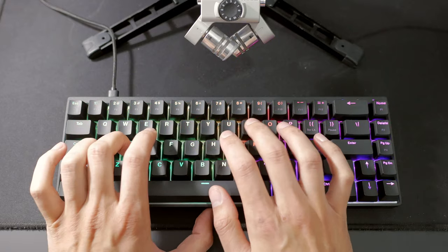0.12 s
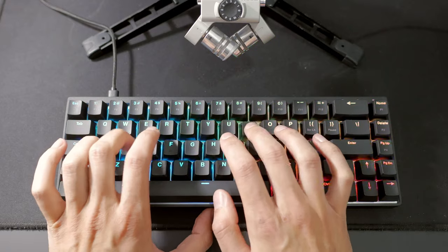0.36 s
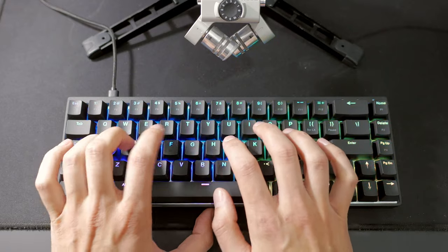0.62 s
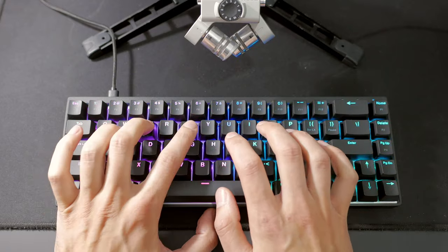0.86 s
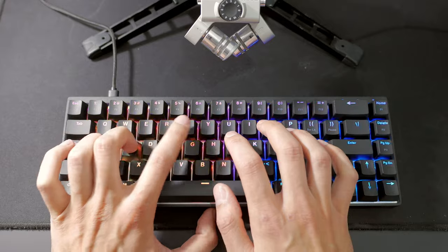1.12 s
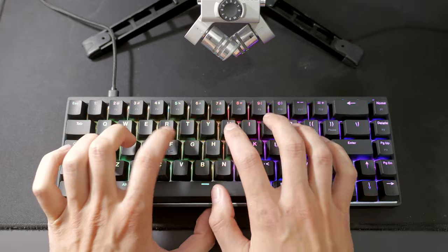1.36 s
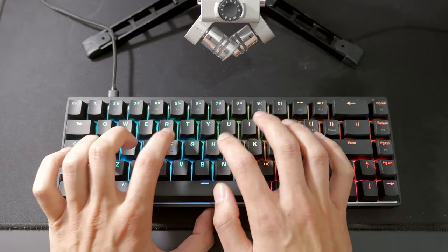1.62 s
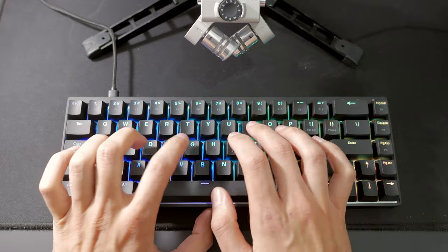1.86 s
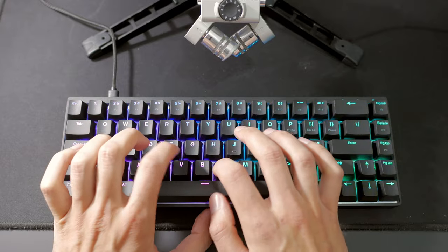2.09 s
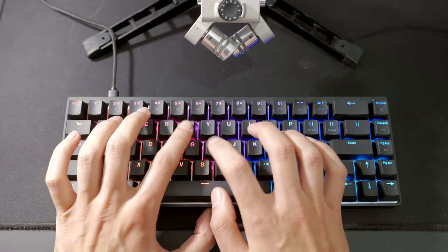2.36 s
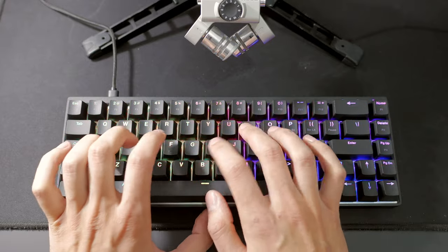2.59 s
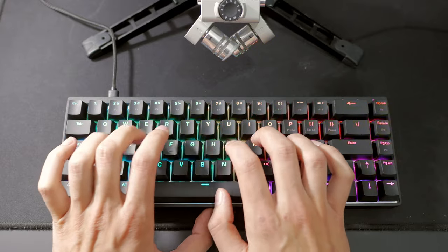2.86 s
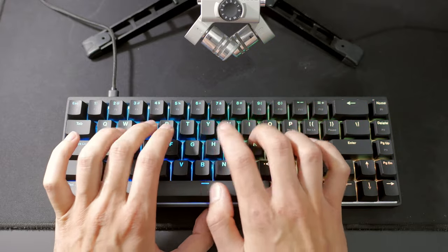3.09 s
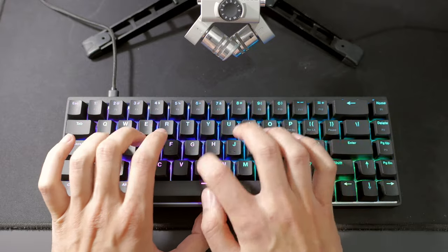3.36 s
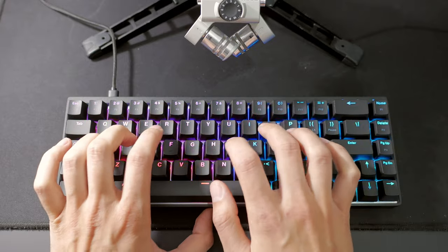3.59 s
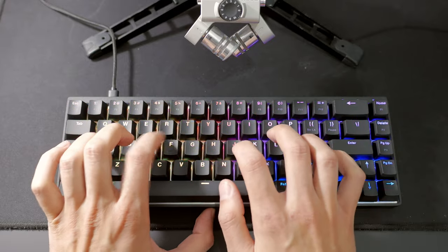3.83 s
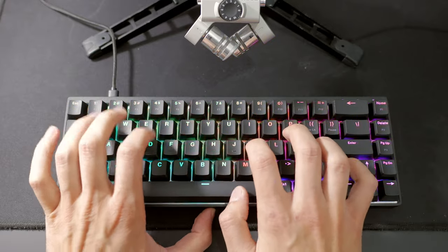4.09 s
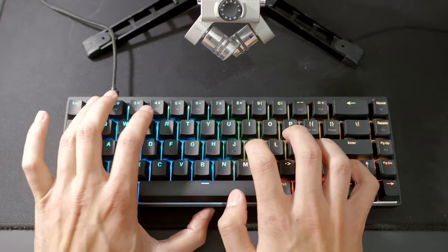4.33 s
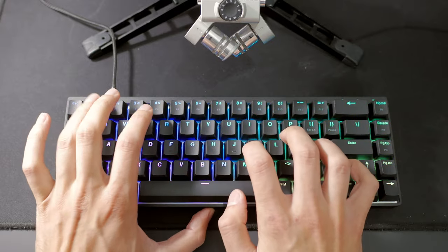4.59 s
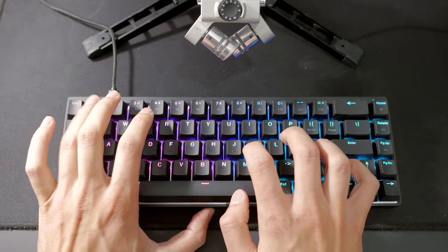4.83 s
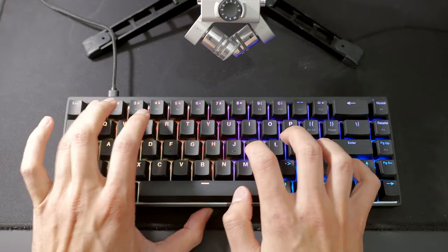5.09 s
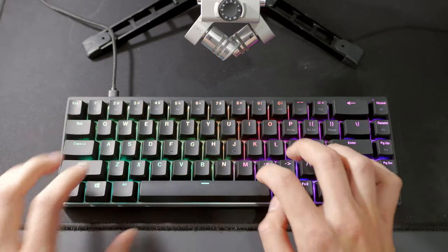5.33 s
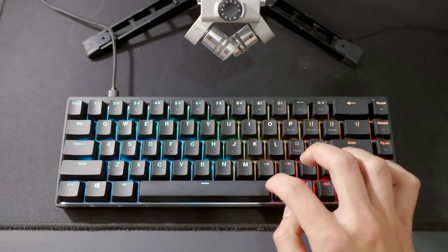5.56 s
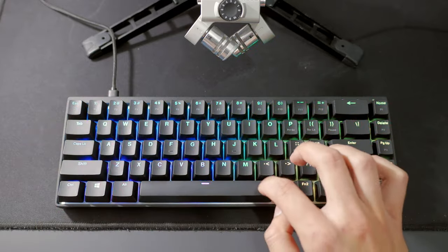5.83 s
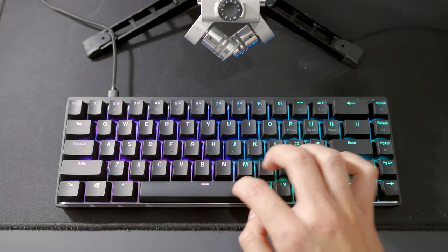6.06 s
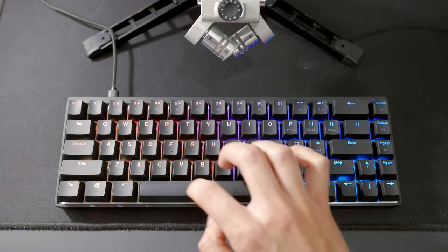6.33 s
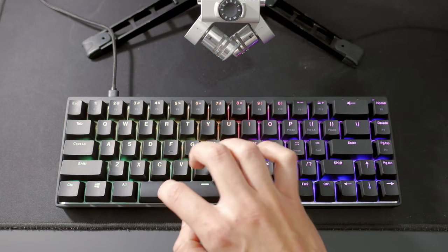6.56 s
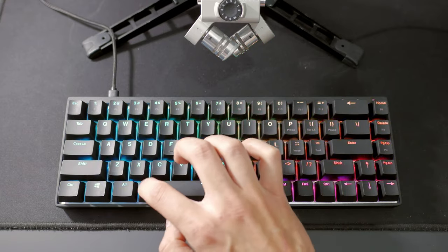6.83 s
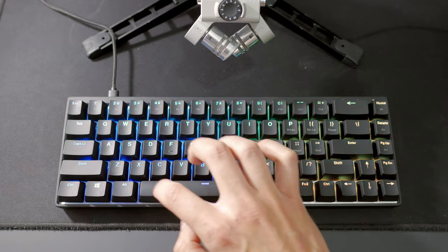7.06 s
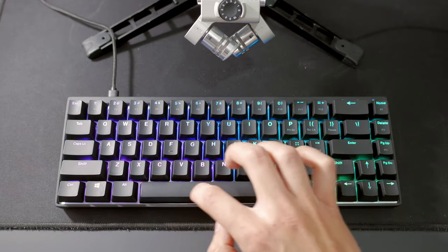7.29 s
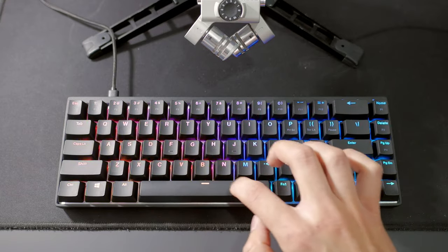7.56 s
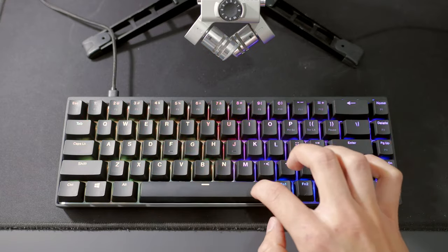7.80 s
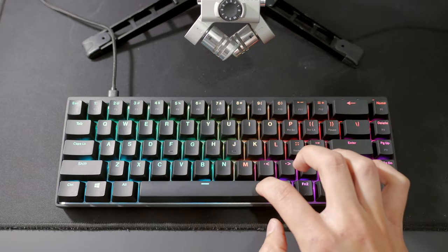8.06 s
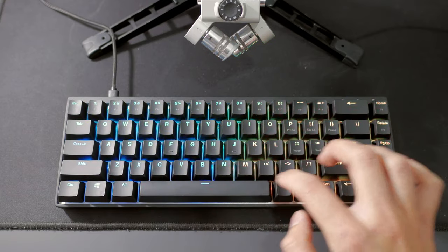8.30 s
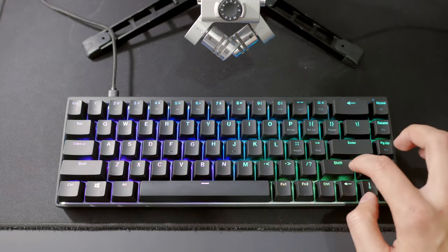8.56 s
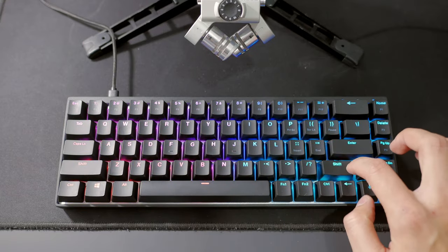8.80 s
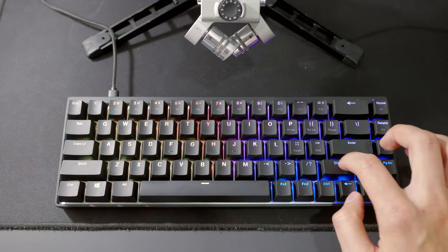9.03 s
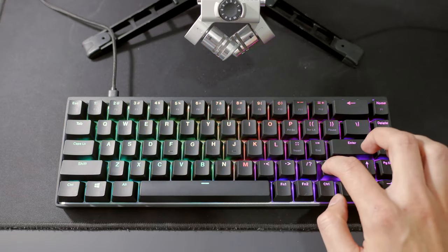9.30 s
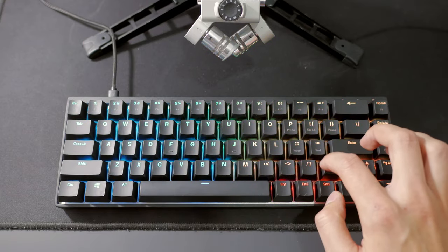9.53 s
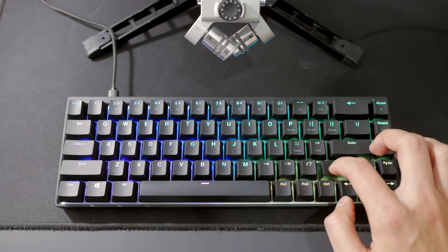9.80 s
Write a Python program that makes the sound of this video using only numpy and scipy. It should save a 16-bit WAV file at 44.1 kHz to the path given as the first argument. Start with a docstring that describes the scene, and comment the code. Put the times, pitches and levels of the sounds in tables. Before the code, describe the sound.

Fast, dry clacking on a mechanical keyboard at close range, then two gaps and steady single-key drumming, deeper spacebar thocks and enter-key clunks, small quiet room.

```python
"""Fast typing, letters under both hands, on a mechanical keyboard on a desk mat, heard by a crossed stereo pair
close behind it in a small room; then one finger drums shift, enter, space and enter again.
Each stem hits bottom or top: a rattling contact rings case, cap and stem for a few ms, and the desk thumps.
Soft rubs and scrapes lead into each blow; once a spring pings and the hollow case knocks.
A diffuse noise tail makes the room; wavering mains hum, rumble and hiss lie below."""
import sys
import numpy as np
from scipy import signal
from scipy.fft import rfft, irfft, next_fast_len
from scipy.io import wavfile
from scipy.ndimage import uniform_filter1d

SR = 44100
rng = np.random.default_rng(int(sys.argv[2]) if len(sys.argv) > 2 else 0)


def transcribe(u):
    """Save the signal u as a 16-bit wav file named by the first command-line argument.

    u: samples, shape (n,) or (channels, n), limited to [-1, 1]; the rate is SR.
    q: integer samples, one column per channel.
    """
    v = np.clip(np.atleast_2d(u).T, -1, 1)
    q = np.round(v * 32767).astype(np.int16)
    wavfile.write(sys.argv[1], SR, q)


def ratio_of_db(decibels):
    """Turn decibels (scalar or array-like) into linear amplitude factors; 0 dB maps to 1."""
    return 10 ** (np.asarray(decibels, float) / 20)


N = 437031

# stem hits its stop: (time [s], force [dB], hardness as tick over knock [dB], push of the hand into the desk [dB])
BLOWS = [(0.1099, -16.5, 14.5, -42), (0.1338, -16.5, 2, -42), (0.2074, -13.5, 3.5, -37),
         (0.2796, -16, -1, -26.5), (0.387, -11.5, 0.5, -24.5), (0.4781, -14.5, 6, -32),
         (0.566, -16.5, 5, -58.5), (0.6364, -17.5, 2, -33.5), (0.7188, -13, -5, -26.5),
         (0.749, -18.5, -6, -32.5), (0.8188, -15, 6, -31), (0.924, -13, 27, -39), (0.998, -13, 26.5, -43),
         (1.0324, -14.5, 4.5, -36), (1.14, -17, 0, -30.5), (1.2797, -17.5, 3.5, -39.5),
         (1.375, -17, 8.5, -37.5), (1.388, -14.5, -13, -25), (1.4967, -17.5, 3.5, -28.5),
         (1.694, -12.5, 9, -40), (1.8805, -24, 47, -31.5), (1.894, -15, 3, -38), (1.98, -15.5, 20, -42),
         (2.0505, -16.5, 2.5, -38.5), (2.112, -18.5, -1, -43.5), (2.1495, -16, 30, -57.5),
         (2.1601, -17, 0.5, -31.5), (2.24, -15, 2, -42), (2.3391, -13, -8, -26.5),
         (2.4522, -18, 6.5, -31.5), (2.5457, -13.5, 14.5, -40.5), (2.6472, -11, 2, -34),
         (2.7381, -12.0, 24.5, -36.5), (2.8928, -16, -5.5, -28), (3.0668, -13.5, 11.5, -33),
         (3.168, -11.5, 7, -35), (3.2653, -17, 8.5, -42.5), (3.367, -10.5, 32.5, -33),
         (3.4605, -22.5, 22.5, -35.5), (3.4794, -17, 3, -38), (3.542, -17.5, 2, -45),
         (3.6216, -14.5, 32.5, -35.5), (3.7345, -17, -2, -32.5), (3.816, -17, 10.5, -39.5),
         (3.8601, -19, 3, -49), (3.9059, -16.5, 0.5, -42), (4.0031, -17, 7, -33.5),
         (4.0925, -14, -8.5, -26), (4.114, -21, 0, -32.5), (4.3916, -8.5, -3.5, -33.5),
         (4.4672, -11, -3, -37), (4.576, -8, -1.5, -29), (4.654, -11.5, -2, -36), (4.746, -11, -3, -33),
         (4.842, -17, -4.5, -39), (4.944, -13, -10, -42.5), (5.0055, -16.5, -3.5, -41.5),
         (5.0963, -9.5, -2.5, -32), (5.194, -16, -5, -37), (5.2463, -15.5, 3, -41),
         (5.8624, -15.5, -5.5, -30), (5.9319, -9.5, 1.5, -29), (6.0121, -11, -2.5, -26),
         (6.0938, -12.5, 1, -31.5), (6.168, -10, -3, -26.5), (6.2605, -16.5, -11, -30),
         (6.3374, -12.5, -1.5, -26), (6.4942, -15, -4, -25), (6.5728, -15.5, -5, -32.5),
         (6.6462, -16.5, 9.5, -42.5), (6.6686, -15.5, -10.5, -24), (6.8188, -18.5, -3.5, -33),
         (7.012, -17, -3, -25.5), (7.157, -18, 15.5, -34.5), (7.186, -16.5, -6, -27.5),
         (7.2515, -14, -2.5, -28), (7.3541, -13.5, -3, -25), (7.4274, -17, -6, -28.5),
         (7.5309, -11.5, -5.5, -26.5), (7.606, -15, -2, -29), (7.6929, -11, -7, -24.5),
         (7.8715, -11.5, -3, -24.5), (8.0432, -11, -11.5, -26.5), (8.1377, -17, -0.5, -31),
         (8.222, -10.5, -7.5, -24), (8.2992, -8, 6, -25.5), (8.937, -12, -2, -34),
         (9.0237, -14.5, -2.5, -29), (9.0998, -13, -7.5, -35), (9.183, -12.5, -3.5, -26),
         (9.3585, -13.5, 0, -29), (9.5291, -13, -7, -30), (9.7031, -12.5, -3, -29),
         (9.78, -15.5, -1.5, -37.5), (9.87, -11, 0, -25)]
# lighter contacts, a fingertip lands, a stem rattles or a released key comes back up: (time [s], level [dB])
TOUCHES = [(-0.005, -22), (0.272, -24), (0.376, -35.5), (0.417, -26), (0.626, -27.5), (1.256, -29),
           (1.48, -29.5), (1.604, -19.5), (2.011, -36), (2.429, -23.5), (2.523, -29.5), (2.76, -30),
           (2.868, -22.5), (2.913, -29.5), (3.089, -28), (3.131, -29.5), (4.204, -24), (4.232, -23),
           (4.361, -32.5), (5.829, -36), (6.416, -25), (6.467, -28), (6.735, -18.5), (6.848, -29.5),
           (6.912, -19), (6.98, -26), (7.078, -23.5), (7.775, -19), (7.965, -24.5), (8.19, -31),
           (8.798, -42.5), (8.839, -35), (8.865, -37.5), (9.257, -19), (9.426, -19), (9.6, -21.5)]
# keys in play: (from [s], key [1 letters 2 shift 3 space 4 enter], left minus right before the parts' offset [dB],
# change of colour [dB], rattle before stretching [ms], spread of tuning [share])
KEYS = [(0, 1, 0, 9.5, 4.47, 0.068), (4.3, 2, -2.5, -4.2, 2.68, 0.013), (5.22, 4, 2, 4, 7.9, 0.0049),
        (5.5, 3, -0.3, 3, 3.53, 0.011), (8.5, 4, 4, 3.5, 3.9, 0.025)]
# by key (letters, shift, space, enter): (share of the force in the cap [dB], in case and stem together [dB],
# hardness of a light touch [dB], gain of the desk's upper modes [dB], lowest pitch radiated [Hz])
KEY_SHARES = [(-3, -1.5, -3, 2, 260), (-4, -1.5, 6, -2.5, 510), (-3, -5, -9, 2.5, 330),
              (-7, -3, -7, -6, 453)]
# soft rub before a blow, relative: by key (letters, shift, space, enter) [dB]
RUB_DB = (1, -18.5, 3, 4.5)
# modes of case (knock), cap (clack) and stem (tick), one row a mode: (letters, shift, space, enter [dB])
KNOCK_MODES_DB = [(-11, -17.5, 0, 2), (-7, -24.5, -5, 7.5), (5.5, 11, -46.5, -3.5), (7.5, 5.5, 11, 17),
                  (10.5, 10.5, 7.5, 5), (8, 11.5, 7.5, 0.5)]
CLACK_MODES_DB = [(-2, -3.5, -2, -4), (1.5, 1, -4.5, -11.5), (7, 0.5, 1, 0.5), (4, -5.5, 8.5, 2),
                  (7, -5, 7, -0.5), (0, -1.5, 1, -1.5)]
TICK_MODES_DB = [(-5, 0, 1, 3), (-5.5, -18, -0.5, 5), (5.5, -6, 6, 3), (5, 9, 3, 3.5),
                 (-13.5, -18, 4, -1.5), (-14.5, -9, -12, -16.5)]
# pitches of those modes before the change of tuning: one a mode [Hz]
KNOCK_HZ = (515, 704, 1100, 1250, 1420, 1760)
CLACK_HZ = (2180, 2435, 2760, 3035, 3600, 4280)
TICK_HZ = (5000, 6300, 7850, 8650, 11600, 14500)
# spring ping, then case modes: (level [dB], pitch [Hz], t60 [s])
SPRING = [(-24, 6380, 0.046), (-17.5, 690, 0.024), (-38, 1100, 0.26)]
# desk and stand modes: (pitch [Hz], level over push [dB], t60 [s], left minus right [dB], left leads [rad])
DESK = [(59.7, -3.5, 0.67, -1.5, 1.5), (87.8, -1, 0.079, 1, 0.4), (123.4, -3, 0.23, -6.1, 0.58),
        (176.3, -2.5, 0.069, 3.5, 0.39), (249.4, -1, 0.082, 4.5, 1.73), (338, -6.5, 0.055, -5.5, 0.45),
        (454, -11.5, 0.071, -4, 0.46)]
# room decay: (band [Hz], t60 [s])
ROOM_T60 = [(100, 1), (12000, 0.33)]
# mains hum before the waver: (pitch [Hz], level [dB rms])
HUM = [(119.8, -55.5), (239.6, -68), (359.4, -75)]
# rumble and hiss, relative spectrum: (pitch [Hz], density [dB])
AIR = [(25, -51), (36, -75), (50, -73), (140, -88), (1000, -108), (2200, -115), (15000, -121)]


def blows():
    """Stems hit their stops: a firm push gives one sharp click, a light one a blunt rattle."""
    s, force_db, hardness_db, push_db = np.transpose(BLOWS)
    firm_push_db, click_db_per_push_db = -30, 0.59
    sharp = ratio_of_db(click_db_per_push_db * np.minimum(push_db - firm_push_db, 0))
    stem_click, heavy_click = 5.5 * sharp, 28 * sharp[:, None]   # height over the chatter
    contact = rattle(s, stem_click, stretch=0.75, rise_ms=0.29)
    return strike(s, contact, *share_out(s, force_db, hardness_db), heavy_click)


def touches(s, level_db, stretch, rise_ms, brighter_db=0):
    """Soft, drawn-out contacts: chatter without a first click."""
    hardness_db = shares_at(s)[2] + brighter_db
    return strike(s, rattle(s, 0, stretch, rise_ms), *share_out(s, level_db, hardness_db))


def slides():
    """Before every blow comes a soft rub, then a short scrape of the stem in its guide; after it the cap shakes."""
    s, force_db = np.array(BLOWS)[:, 0], np.array(BLOWS)[:, 1]
    chance = rng.standard_normal((len(s), 4))
    uneven_db = 2.5 * chance[:, 1:3]
    rub_db = force_db + np.array(RUB_DB)[key_index(s)] - 25.5 + uneven_db[:, 0]
    scrape_db = force_db - 22.5 + uneven_db[:, 1]
    rub = touches(s - 0.027 + 0.0035 * chance[:, 0], rub_db, 2.0, 19.0, brighter_db=3.0)
    scrape = touches(s - 0.009 + 0.0014 * chance[:, 3], scrape_db, 1.6, 2.5, brighter_db=4.8)
    shake = touches(s, force_db - 13, 1.79, 11.0)
    return rub + scrape + shake


def key_at(times):
    """The row of KEYS in play at each time."""
    keys = np.array(KEYS)
    return keys[np.searchsorted(keys[1:, 0], times)]


def key_index(times):
    """Which key is in play, from 0: letters, shift, space, enter."""
    return np.round(key_at(times)[:, 1]).astype(int) - 1


def shares_at(times):
    """The columns of KEY_SHARES for the key in play at each time."""
    return np.array(KEY_SHARES)[key_index(times)].T


def share_out(s, force_db, hardness_db):
    """Knock, clack and tick levels: a hard contact favours the stem's tick, a soft one the case's knock."""
    cap_db, rest_db = shares_at(s)[:2]
    knock_db = force_db + rest_db - 10 * np.log10(1 + ratio_of_db(hardness_db) ** 2)
    return knock_db, force_db + cap_db, knock_db + hardness_db


def rattle(times, first, stretch, rise_ms):
    """One contact per row: a first click, then uneven chatter that dies away."""
    ms = np.arange(1024) * 1000 / SR
    draw = rng.standard_normal((len(times), 2, 1024))
    length_ms = stretch * key_at(times)[:, 4:5] * np.exp(0.33 * draw[:, 0, :1])
    envelope = np.exp(-(ms / length_ms) ** 2) * (1 - np.exp(-ms / rise_ms))
    chatter = draw[:, 0] * np.exp(0.54 * draw[:, 1]) * envelope
    chatter[:, 0] = first
    return chatter


def strike(s, contact, knock_db, clack_db, tick_db, first=0):
    """Case, cap and stem ring from one contact; case and cap get an added click just after the start."""
    heavy = contact + first * (np.arange(1024) == 18)
    knock = ring(s, heavy, KNOCK_HZ, KNOCK_MODES_DB, 20, knock_db, pan_db=-4, apart_rad=0.6)
    clack = ring(s, heavy, CLACK_HZ, CLACK_MODES_DB, 24, clack_db, pan_db=0.2, apart_rad=0.55)
    tick = ring(s, contact, TICK_HZ, TICK_MODES_DB, 15, tick_db, pan_db=0.3, apart_rad=0.95)
    sound = knock + clack + tick
    edge_hz = shares_at(s)[4]
    for hz in np.unique(edge_hz):   # each key sounds thin below its own lowest pitch
        highpass = signal.butter(4, hz, "high", fs=SR, output="sos")
        sound[edge_hz == hz] = signal.sosfilt(highpass, sound[edge_hz == hz])
    return place(s, sound)


def ring(times, contact, hz, modes_db, cycles, level_db, pan_db, apart_rad):
    """The contact strikes modes of chance strength and tuning, with chance phase between capsules.

    Each mode dies by 60 dB in the given cycles; a weak part rings on."""
    linger_db, times_longer = -24, 5.0
    t, modes_db, key = np.arange(3072) / SR, np.array(modes_db), key_at(times)
    draw = rng.standard_normal((len(times), 2, len(modes_db)))
    own_db = modes_db.T[key_index(times)]
    strength = ratio_of_db(own_db + key[:, 3:4] * draw[:, 0]) * (-1) ** np.arange(len(modes_db))
    side = np.array([0.5, -0.5])[:, None]
    phase = np.exp(1j * apart_rad * side * draw[:, 1, None])
    capsules = phase * ratio_of_db(side * (key[:, 2] + pan_db)[:, None, None])
    weights = strength[:, None] * capsules
    tuning = 1 + key[:, 5] * (rng.integers(0, 5, len(times)) / 2 - 1)
    free = np.zeros((len(times), 2, len(t)))
    for factor in np.unique(tuning):
        turns = factor * np.outer(hz, t)
        decay = ratio_of_db(-60 * turns / cycles) + ratio_of_db(linger_db - 60 * turns / (times_longer * cycles))
        waves = np.exp(2j * np.pi * turns) * decay
        free[tuning == factor] = np.imag(weights[tuning == factor] @ waves)
    sound = convolve(free, contact[:, None], size=3072)
    peak_power = uniform_filter1d(2 * sound.mean(1) ** 2, size=60).max(1)
    return sound * (ratio_of_db(level_db) / np.sqrt(peak_power))[:, None, None]


def convolve(a, b, size):
    """Convolution along the last axis."""
    n = next_fast_len(a.shape[-1] + b.shape[-1])
    return irfft(rfft(a, n) * rfft(b, n), n)[..., :size]


def place(times, sounds):
    """Lays (events, 2, samples) out in time; the result begins one sound length before the start."""
    size = sounds.shape[-1]
    out = np.zeros((2, N + 2 * size))
    for s, sound in zip(times, sounds):
        i = size + round(s * SR)
        out[:, i:i + size] += sound
    return out[:, :size + N]


def spring():
    """As the hands leave, a spring pings and the hollow case knocks and rings on: dying sines."""
    t = np.maximum(np.arange(N) / SR - 5.247, 0)
    return sum(ratio_of_db(level_db - 60 * t / t60_s) * np.sin(2 * np.pi * hz * t) for level_db, hz, t60_s in SPRING)


def desk():
    """Each blow pushes the desk; its low modes reach the capsules through the stand, not quite in step."""
    s, push_db = np.array(BLOWS)[:, 0], np.array(BLOWS)[:, 3]
    at, out = np.round(s * SR).astype(int), np.zeros((2, N))
    draw = rng.standard_normal((len(at), len(DESK), 2))
    side = np.array([[0.5], [-0.5]])
    for k, (hz, level_db, t60_s, pan_db, lead_rad) in enumerate(DESK):
        upper_db = (k > 3) * shares_at(at / SR)[3]
        uneven_db = 1.3 * draw[:, k, 0]
        phase_rad = side * (lead_rad + 0.5 * draw[:, k, 1])
        push = np.full((2, N), 1e-18 + 0j)
        push[:, at] = ratio_of_db(push_db + level_db + upper_db + uneven_db + side * pan_db) * np.exp(1j * phase_rad)
        pole = ratio_of_db(-60 / (t60_s * SR)) * np.exp(2j * np.pi * hz / SR)
        out += np.imag(signal.lfilter([1], [1, -pole], push))
    return uniform_filter1d(out, size=41, origin=20)   # each push lasts 41 samples


def at_hz(points, hz):
    """Reads a table on a log-frequency axis."""
    points = np.array(points)
    return np.interp(np.log(hz), np.log(points[:, 0]), points[:, 1])


def room(x):
    """A diffuse tail: octave bands of noise, each dying at its own rate, partly shared by the channels."""
    t, tail = np.arange(SR // 2) / SR, 0
    for hz in 125 * 2.0 ** np.arange(8):
        edges_hz = [hz / np.sqrt(2), min(hz * np.sqrt(2), 0.45 * SR)]
        band = signal.butter(2, edges_hz, "band", fs=SR, output="sos")
        noise = rng.standard_normal((3, len(t)))
        decay = ratio_of_db(-60 * t / at_hz(ROOM_T60, hz))
        tail = tail + signal.sosfilt(band, noise[:2] + 0.73 * noise[2]) * decay
    tail = tail * (1 - np.exp(-t / 0.002))
    return convolve(x.mean(0), tail / np.sqrt(np.sum(tail ** 2) / 2), size=x.shape[-1])


def rms_one(x):
    """Scales to rms 1."""
    return x / np.sqrt(np.mean(x ** 2) + 1e-20)


def hum():
    """Mains hum: sines that waver together in pitch and level."""
    t = np.arange(N) / SR
    waver = uniform_filter1d(uniform_filter1d(rng.standard_normal((2, N)), size=4000), size=4000)
    wander_s = 0.0045 * np.cumsum(rms_one(waver[0])) / SR
    tones = sum(np.sqrt(2) * ratio_of_db(db) * np.sin(2 * np.pi * hz * (t + wander_s)) for hz, db in HUM)
    return tones * ratio_of_db(rms_one(waver[1]))


def air():
    """Rumble and hiss: shaped noise, partly shared by the channels."""
    hz = np.maximum(np.fft.rfftfreq(N, 1 / SR), 10)
    white = rng.standard_normal((3, N))
    return irfft(rfft(white[:2] + 0.87 * white[2]) * ratio_of_db(at_hz(AIR, hz)) * np.sqrt(SR / 2), N)


def scene():
    """Keys, desk, room, hum and air; the room still carries what was struck just before the start."""
    keys = blows() + touches(*np.transpose(TOUCHES), stretch=2.2, rise_ms=0.39) + slides()
    keys[:, -N:] += spring()
    return (keys + ratio_of_db(-15) * room(keys))[:, -N:] + desk() + hum() + air()


def roll_off(x):
    """The treble ends steeply here."""
    return signal.sosfilt(signal.butter(12, 17000, fs=SR, output="sos"), x)


def record(dry):
    """The recorder cuts the deepest rumble and the capsules roll off at the top."""
    rumble_cut = signal.butter(2, 40, "high", fs=SR, output="sos")
    capsule_top = signal.butter(6, 15300, fs=SR, output="sos")
    mix = signal.sosfilt(np.vstack([rumble_cut, capsule_top]), dry)
    return roll_off(mix)


dry = scene()
out = record(dry)
transcribe(out)
```